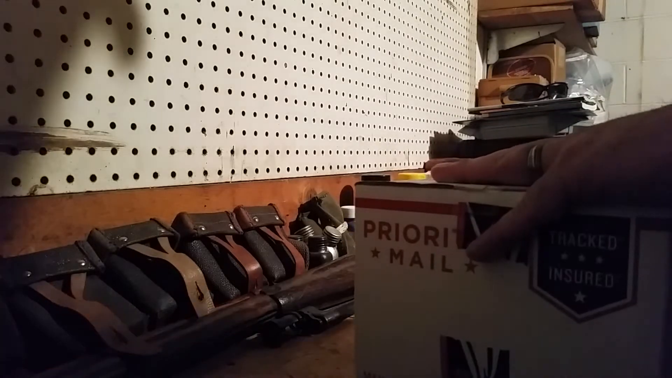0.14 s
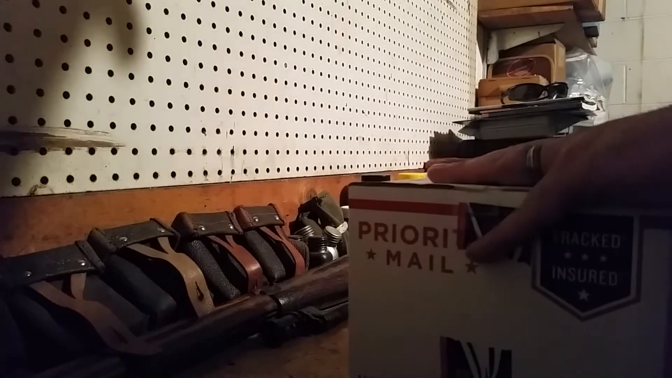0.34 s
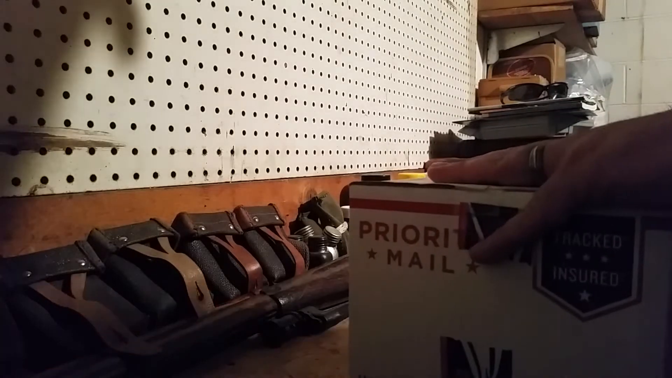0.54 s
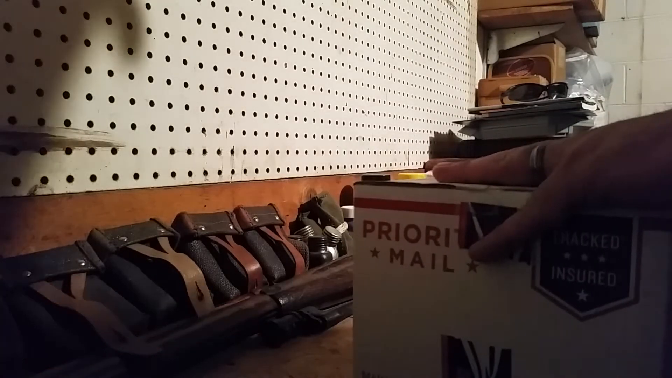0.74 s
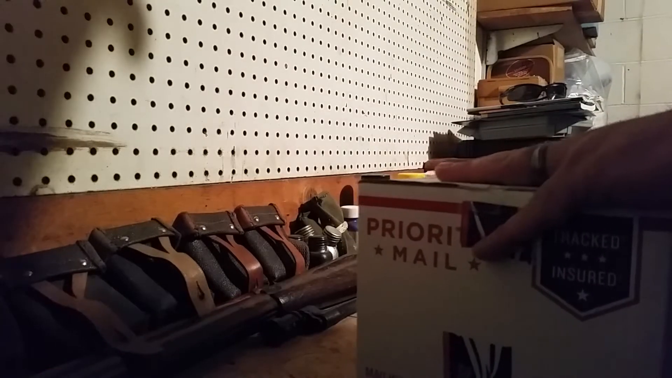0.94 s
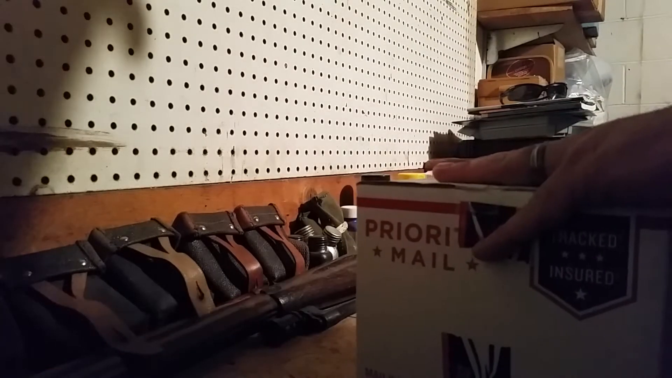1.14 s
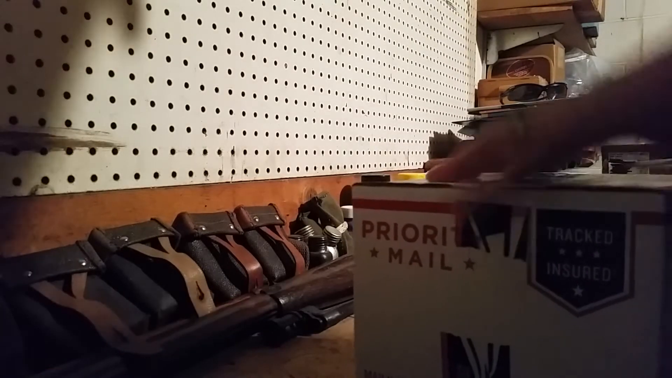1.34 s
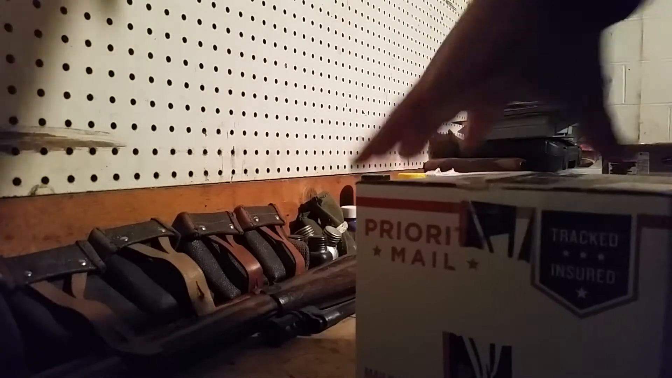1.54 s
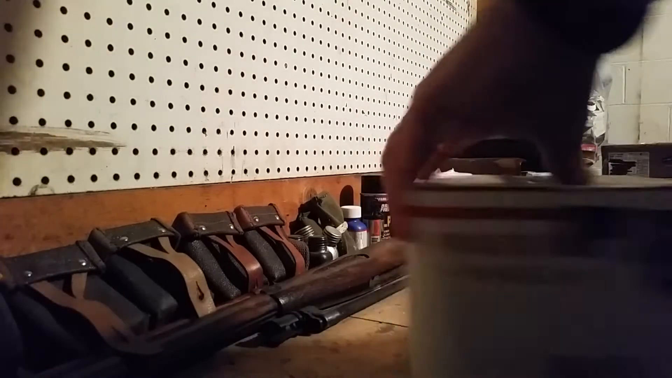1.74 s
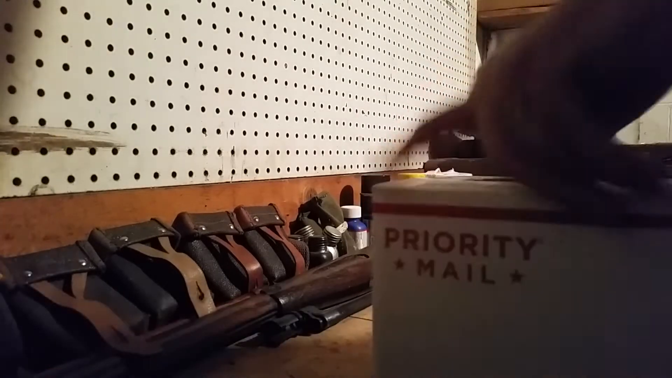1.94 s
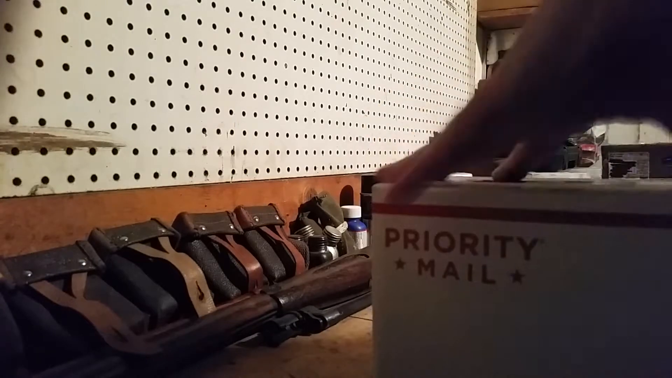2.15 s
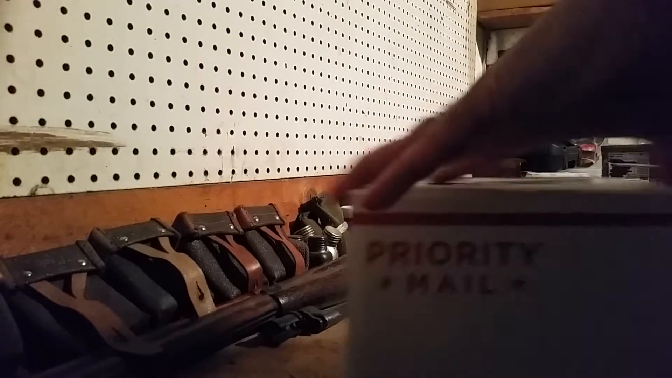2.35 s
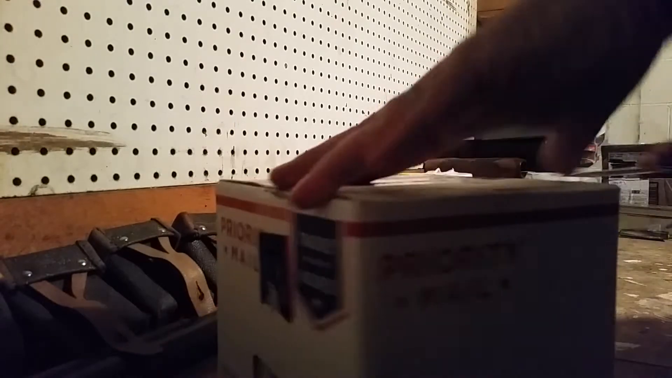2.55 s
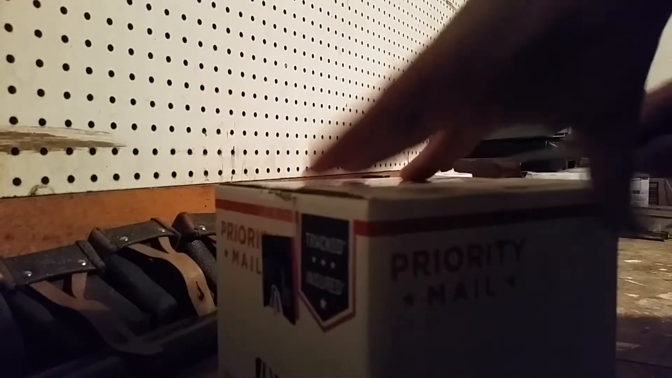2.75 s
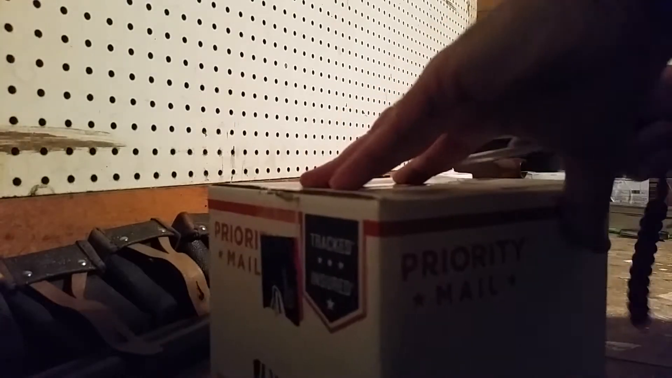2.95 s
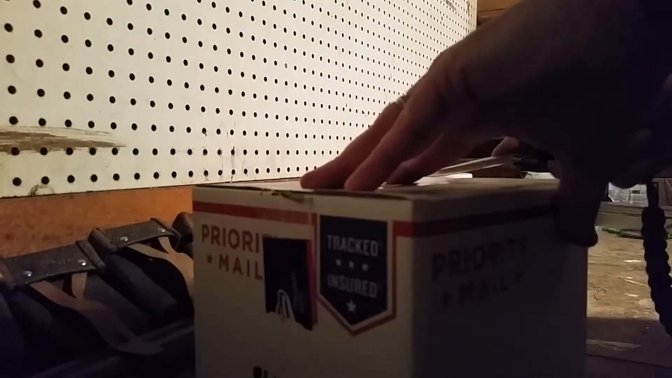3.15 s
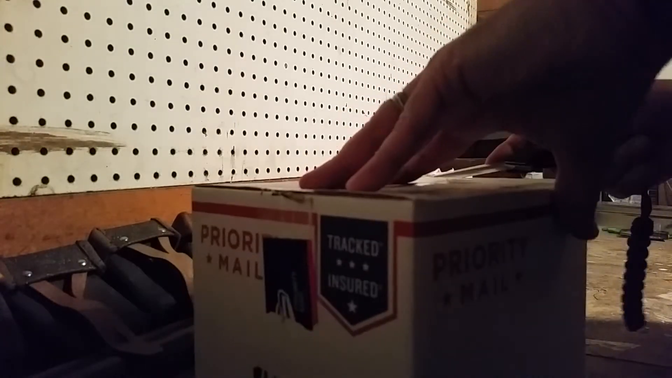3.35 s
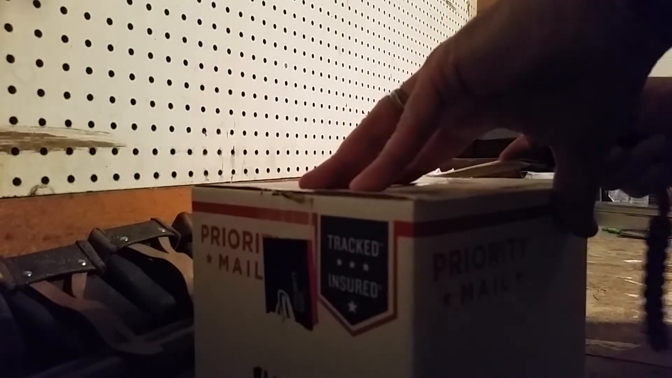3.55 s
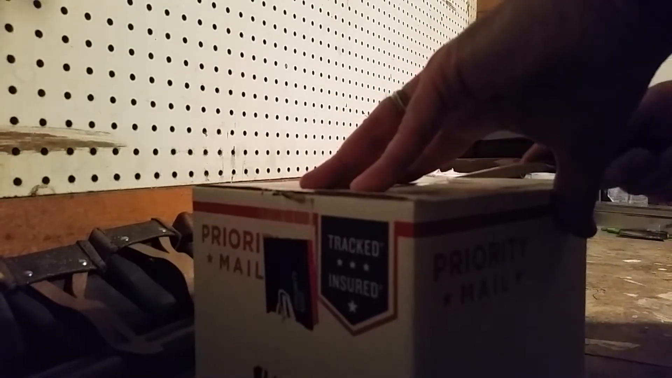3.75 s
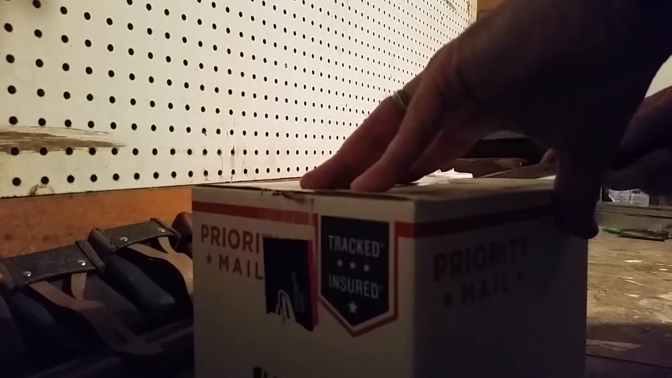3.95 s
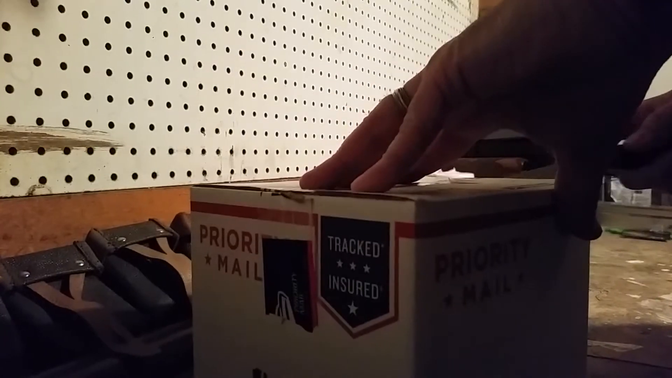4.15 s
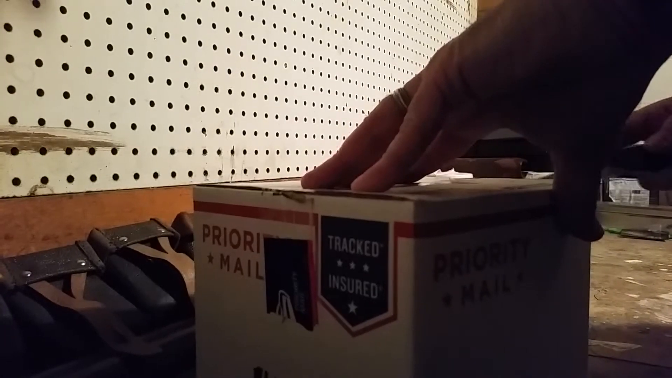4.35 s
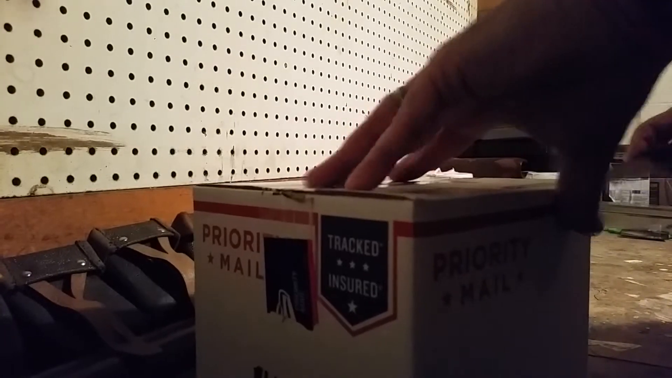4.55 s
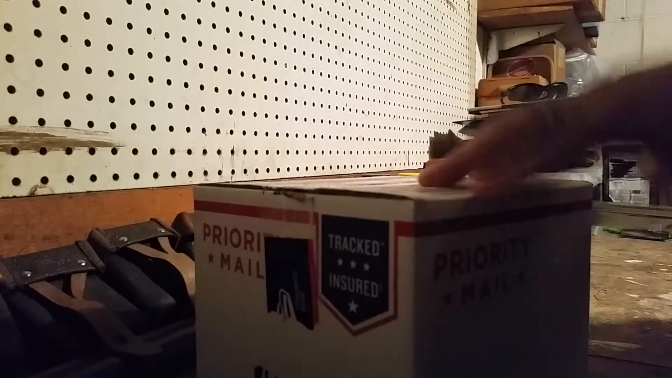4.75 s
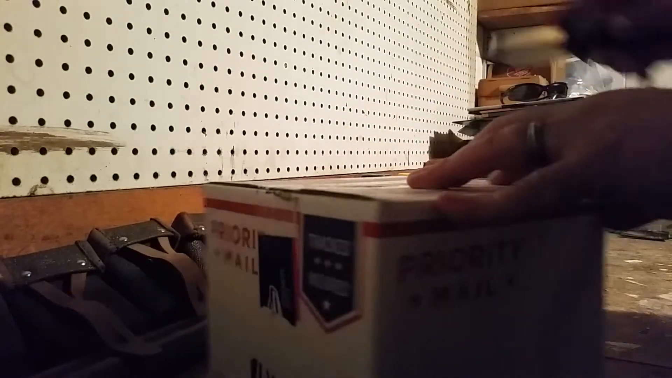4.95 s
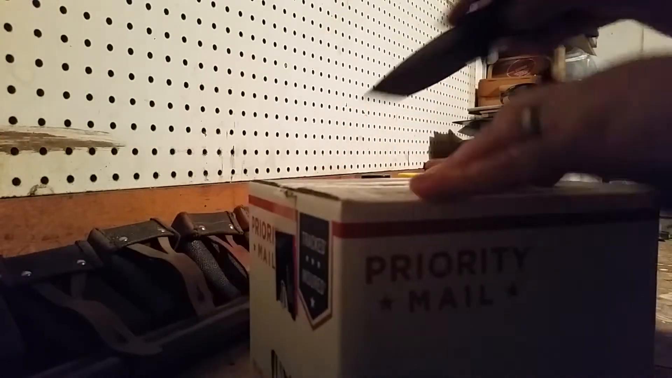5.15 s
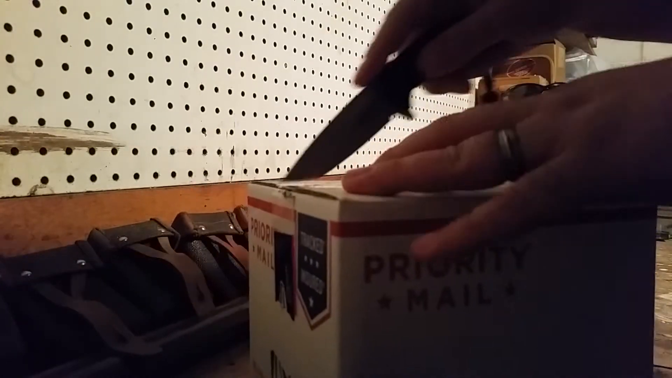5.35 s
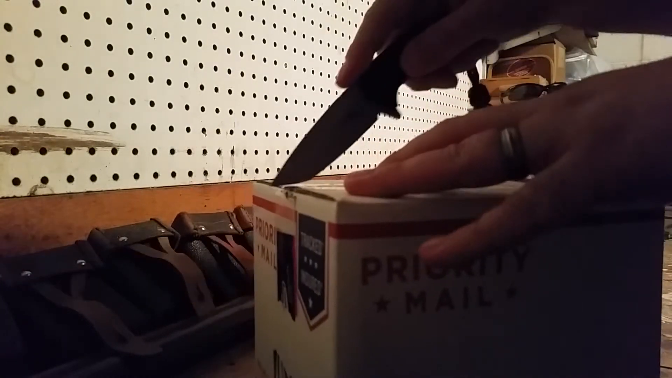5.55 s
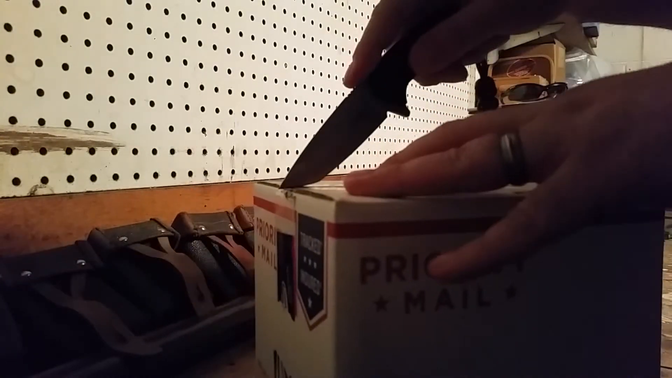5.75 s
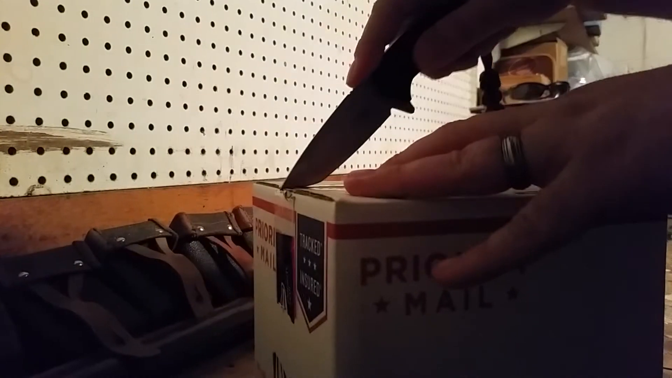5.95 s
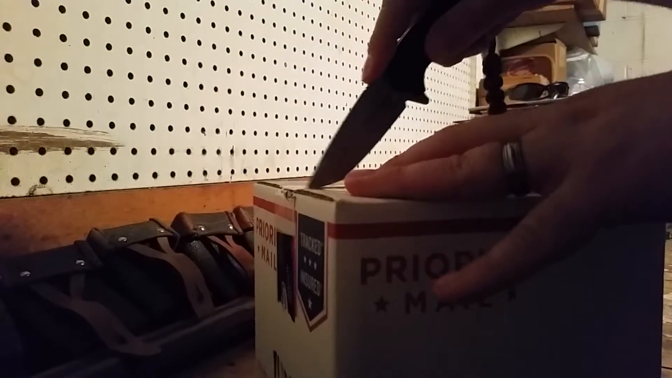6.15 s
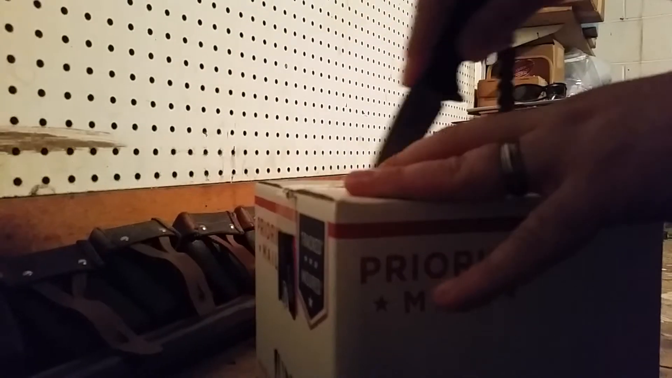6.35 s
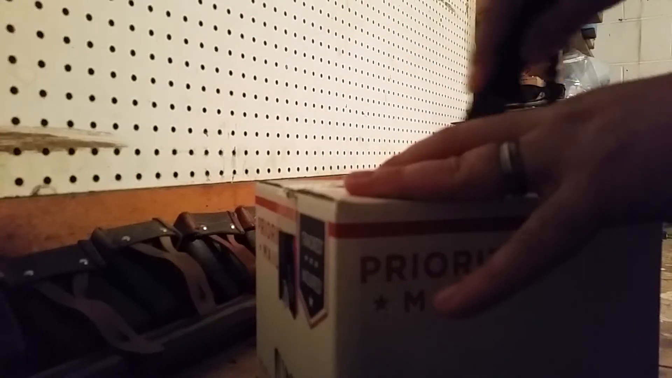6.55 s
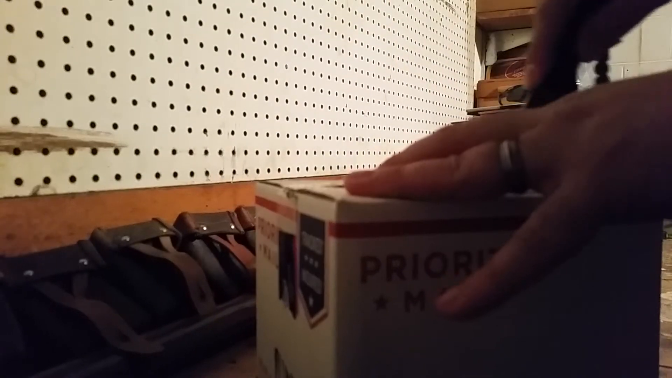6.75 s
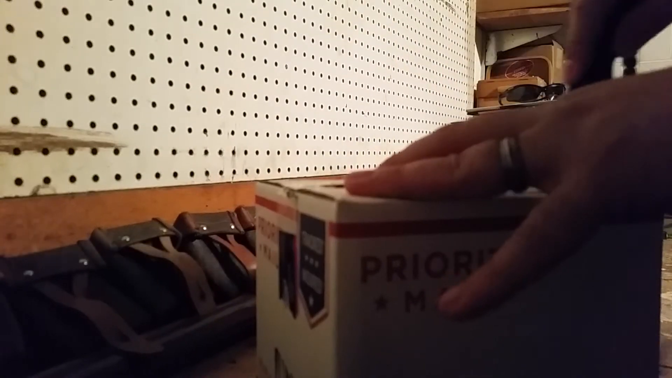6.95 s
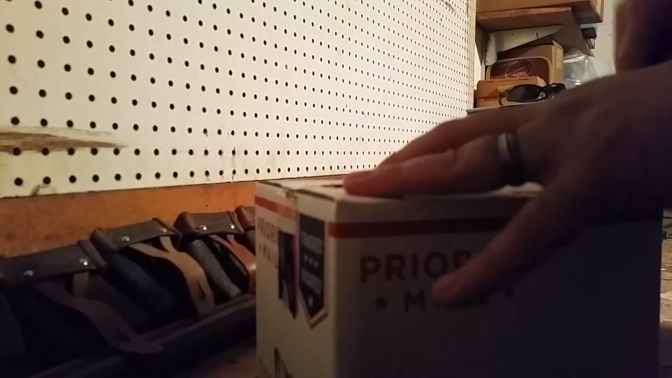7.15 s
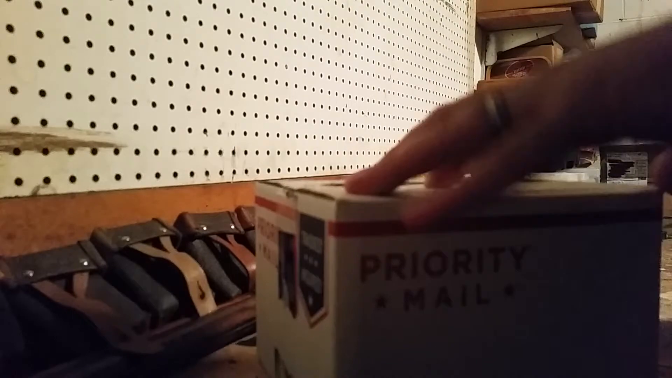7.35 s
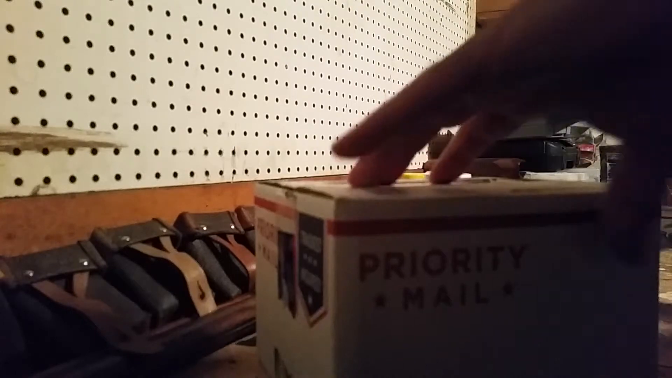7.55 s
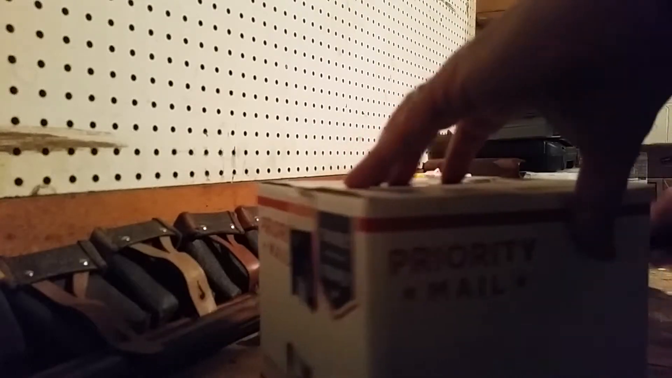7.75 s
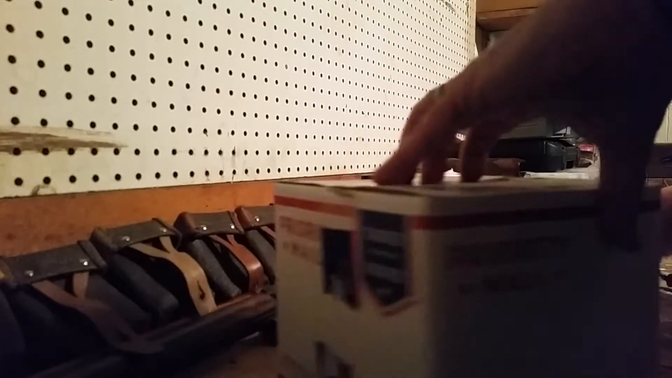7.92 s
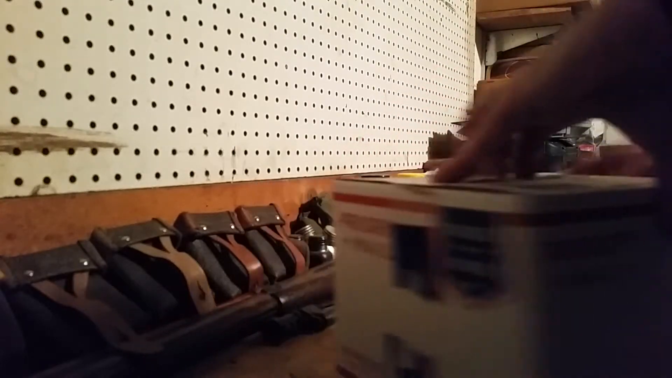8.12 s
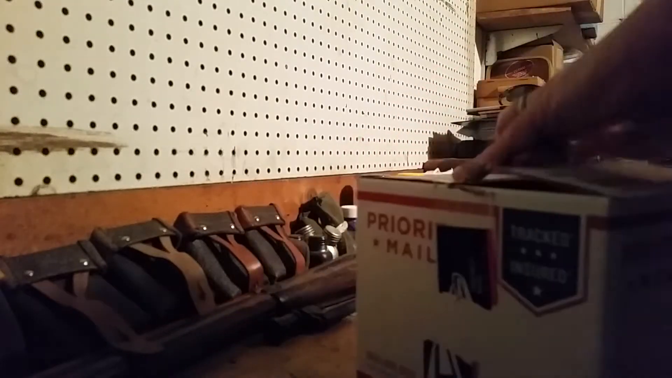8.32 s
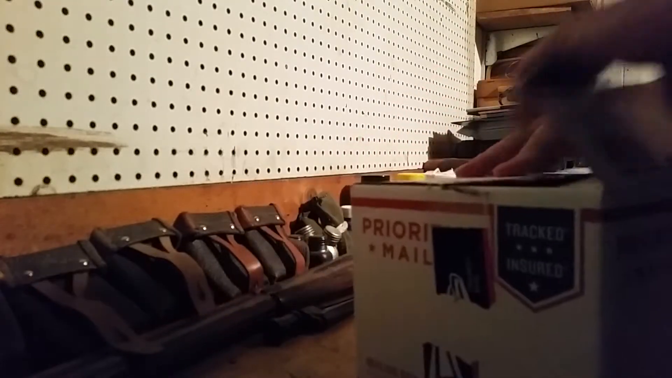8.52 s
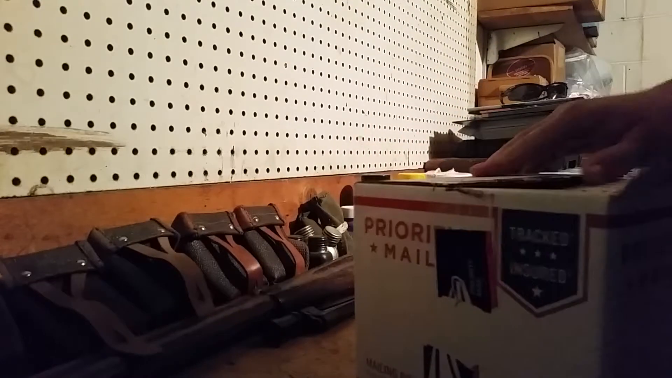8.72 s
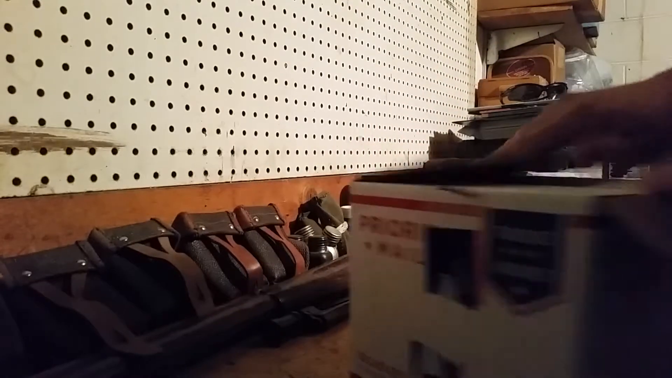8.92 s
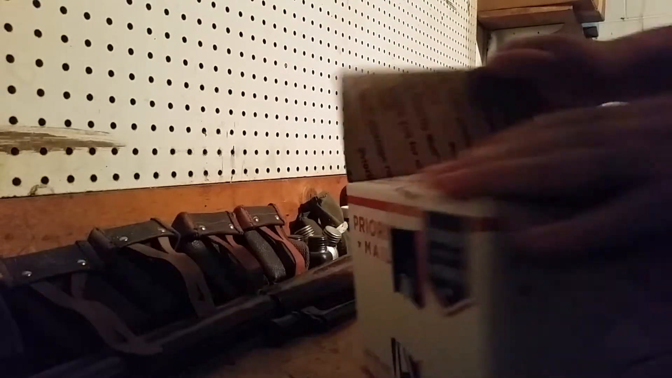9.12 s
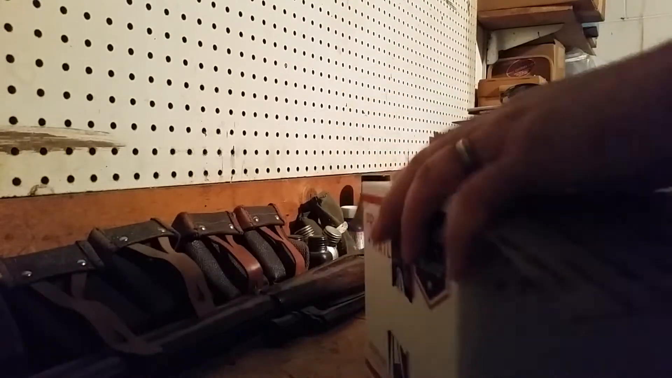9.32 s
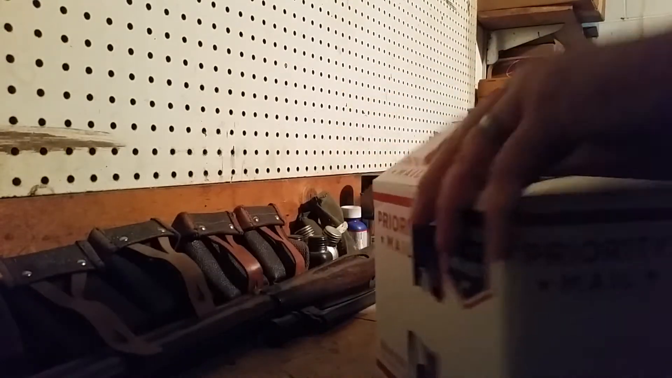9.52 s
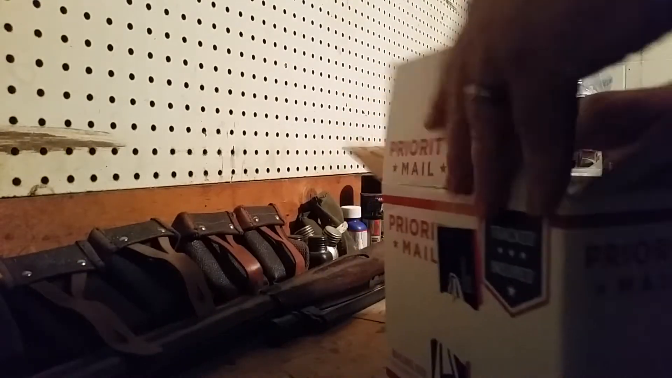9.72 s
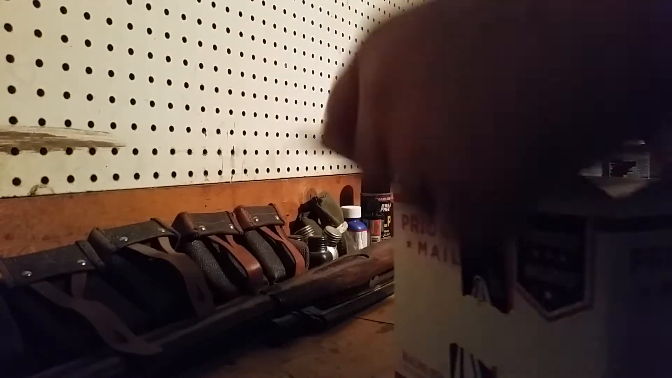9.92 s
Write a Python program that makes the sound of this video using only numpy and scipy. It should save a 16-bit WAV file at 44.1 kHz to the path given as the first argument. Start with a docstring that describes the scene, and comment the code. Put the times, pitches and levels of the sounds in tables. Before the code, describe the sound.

Close by, a cardboard box scuffs and bumps as it is turned on a wooden workbench. A knife scrapes through packing tape in a few short strokes, with small sharp ticks and a firm knock between them. Then a quick cluster of hollow knocks and snaps comes as the flaps are pulled free, followed by cardboard rustling and scraping as they fold back. The room is quiet.

```python
"""A light bump and a scuff of cardboard, right by the microphone: a taped box is turned, dragged and cut
open with a knife on a wooden workbench. Grit under the box and fibres at the blade give dense clicks
that ring the bench, the box walls and the flaps; knocks and snaps strike the same parts.
The microphone is a phone lying on the bench in a quiet shop. Its two ports ring near 11 kHz,
and the right one is nearer the box."""
import sys
import numpy as np
from scipy import signal
from scipy.fft import rfft, irfft
from scipy.io import wavfile
from scipy.ndimage import uniform_filter1d, map_coordinates

SR = 44100
rng = np.random.default_rng(int(sys.argv[2]) if len(sys.argv) > 2 else 0)


def file_out(sig):
    """Save sig as 16-bit WAV at sys.argv[1]."""
    # one column per channel
    cols = np.atleast_2d(sig).T
    # limit, then scale
    lim = np.clip(cols, -1, 1)
    pcm = np.round(lim * 32767).astype(np.int16)
    wavfile.write(sys.argv[1], SR, pcm)


N = 440118
T = np.arange(N) / SR

# Tone curves. Each row: frequency in Hz, relative level in dB.
AIR_TONE = [(60, -12), (125, -4), (250, -18.5), (450, -24), (4000, -41.5), (9000, -67)]  # still shop air and electronics
GRIT_TONE = [(300, 4.5), (1000, -7), (3000, 0.5), (5500, -3), (9000, -3.5), (16000, -4)]  # grit and fibres slipping
TICK_TONE = [(1000, -9), (4000, -2.5), (10500, -7), (16000, -1.5)]
THUD_TONE = [(30, -23), (90, 2.5), (200, -32.5)]  # the whole bench jolts
LEFT_PORT_TONE = [(20, -3), (90, 5), (300, 3), (7800, -3), (9400, 18), (11000, 18), (12500, 11.5),
                  (16000, 16)]
RIGHT_PORT_TONE = [(20, -9), (60, 5.5), (7800, -2), (9300, 11), (10900, 24.5), (12200, 15), (16000, 10.5)]
# Resonances. Each row: frequency in Hz, width in Hz, relative level in dB.
BENCH_MODES = [(94.4, 36, -3.5), (126.2, 20.5, -2.5), (156.3, 34, -0.5), (214.2, 22.3, -1),
               (242.5, 20.3, -0.5), (295.5, 16, -9)]
WALL_MODES = [(342.4, 56, -1.5), (402.7, 40, -2), (464, 45, -2.5), (517, 47, -3.5), (630, 99, 2.5),
              (754, 24, -6), (754, 33, 1)]
FLAP_MODES = [(1035, 320, 7), (1217, 20, 1.5), (1373, 206, 5), (1620, 110, 1.5), (1680, 96, 1),
              (1960, 227, 9), (2197, 505, 9), (2730, 71, 4.5), (2840, 670, 9), (4200, 600, -19.5)]
KNIFE_MODES = [(1810, 65, 1), (2150, 90, -6), (3050, 90, 2)]
# The moving point of contact. Each row: time in seconds, where bench, walls and flaps ring most in Hz,
# left minus right in dB, rubbed walls above bench in dB.
CONTACT_PATH = [(0.0, 180, 430, 1680, -6, -11.5), (2.3, 189, 446, 1516, -6, -1.5),
                (4.2, 198, 429, 1290, -4.5, -12), (5.39, 199, 480, 1620, -7.5, -5.5),
                (6.06, 160.5, 396, 1270, -4, -7.5), (7.28, 154, 500, 2150, -6.5, -8.5),
                (7.62, 197, 448, 1210, -3, -3), (8.48, 220, 427, 1470, -7.5, -3.5),
                (9.23, 140, 479, 1750, -7, -6.5), (9.98, 164, 486, 1870, -5.5, 0)]
# The knife touches something hard. Each row: start in seconds, relative level in dB.
KNIFE_TAPS = [(8.349, -42), (8.506, -33.5)]
# Blade or hand binds. Each row: peak time in seconds, seconds to gain and to lose 20 dB, pitch in Hz,
# glide in Hz per second, relative level in dB.
WALL_GROANS = [(1.255, 0.029, 0.036, 458, 101, -33), (6.56, .05, 0.12, 404, 297, -38),
               (6.712, 0.018, 0.087, 504, 100, -37)]
# Knocks on the box. Each row: start in seconds, relative levels of walls, bench and flaps in dB,
# where the walls ring most in Hz.
BOX_KNOCKS = [(0.029, -81.5, -44, -84, 501), (0.466, -52, -38, -39.5, 484), (1.069, -29, -27.5, -38, 350),
              (1.113, -39, -37.5, -36, 406), (1.208, -28, -50, -35, 420), (1.253, -26.5, -30, -56, 434),
              (1.398, -33, -36, -52, 340), (1.693, -50, -31, -53, 490),(1.768, -38, -38, -48, 340),
              (2.232, -39, -39.5, -47.5, 322), (2.492, -30.5, -34, -37, 334),
              (2.571, -26, -36.5, -31.5, 410), (2.715, -37, -58, -39.5, 432), (2.856, -45.5, -46, -55, 487),
              (3.361, -51, -47, -59, 342), (3.509, -52, -41.5, -72, 364), (4.612, -40, -39.5, -39, 427),
              (4.66, -35.5, -35.5, -43.5, 400), (4.83, -42, -45, -40.5, 500),
              (4.974, -41.5, -33.5, -39, 401), (5.311, -40.5, -36.5, -50, 510), (5.408, -54, -45, -51, 536),
              (5.762, -55.5, -45, -64, 458), (6.331, -17, -24.5, -43, 368), (6.483, -32.5, -40, -39, 398),
              (7.104, -31.5, -25.5, -27.5, 410), (7.813, -35, -43, -52, 415), (7.988, -17, -27.5, -26, 526),
              (8.045, -16.5, -31, -29, 417), (8.077, -21, -45, -22, 404), (8.118, -16.5, -37, -37, 520),
              (8.142, -16, -39, -32, 418), (8.203, -17.5, -36, -33, 440), (8.401, -19.5, -29.5, -22, 394),
              (8.49, -37.5, -41, -48, 440), (8.664, -35, -36.5, -37.5, 567), (8.916, -32.5, -34, -45, 680),
              (8.982, -30, -40, -47, 428), (9.433, -25, -24.5, -31, 390), (9.474, -35.5, -32.5, -54, 369)]
# Bright ticks of tape, glue and knife tip. Each row: start in seconds, relative level in dB.
TAPE_TICKS = [(0.1735, -42), (0.344, -34), (0.4419, -33), (0.6953, -18), (0.7337, -17), (0.7761, -17.5),
              (0.803, -22), (1.0216, -25.5), (1.2061, -14), (1.4895, -32), (1.6846, -37), (1.717, -21.5),
              (1.7669, -17), (2.1477, -30), (2.3364, -29), (2.6643, -34), (3.0908, -28), (3.4221, -39.5),
              (4.324, -24), (4.7214, -32), (4.8344, -36), (4.9492, -29), (4.9684, -22), (5.003, -15),
              (5.0757, -11), (5.0983, -15), (5.3482, -33), (5.7106, -32.5), (6.1973, -23.5),
              (6.3235, -22.5), (6.6145, -19), (7.6872, -13), (7.7588, -21), (7.812, -17), (8.0765, -10),
              (8.329, -27), (8.4012, -16), (8.6345, -24), (8.6744, -16), (9.0558, -17), (9.434, -13.5)]
# Pushes, drags and touches of box and hand. Each row: peak time in seconds, seconds for the grit to gain
# and to lose 10 dB, relative levels of grit, flaps and bench in dB.
BOX_RUBS = [(0.065, 0.039, 0.032, -66, -83.5, -44.5), (0.185, 0.012, 0.054, -52, -75, -63),
            (0.285, 0.068, 0.16, -41, -55, -40.5), (1.028, 0.055, 0.011, -44, -51.5, -42),
            (1.134, 0.083, 0.13, -33, -39, -41), (1.212, 0.016, 0.044, -27, -40.5, -29.5),
            (1.369, 0.023, 0.07, -38, -51, -43.5), (1.49, 0.013, 0.054, -45, -55.5, -51),
            (1.709, 0.012, 0.16, -45, -55, -44.5), (1.891, 0.1, 0.13, -23.5, -41.5, -42.5),
            (2.17, 0.043, 0.12, -43, -75, -78), (2.404, 0.062, 0.15, -29.5, -44, -42.5),
            (2.494, 0.066, 0.062, -24, -38, -44), (2.672, 0.029, 0.047, -44.5, -54, -47),
            (2.954, 0.071, 0.21, -51, -65.5, -54), (3.151, 0.07, 0.073, -39.5, -54, -41.5),
            (3.265, 0.121, 0.023, -58, -62, -70.5), (3.417, 0.029, 0.023, -60, -72, -50.5),
            (4.675, 0.078, 0.059, -48.5, -54.5, -49), (4.862, 0.097, 0.2, -54.5, -65, -69),
            (5.007, 0.024, 0.11, -35, -46, -37), (5.176, 0.16, 0.063, -31.5, -41, -38.5),
            (5.317, 0.07, 0.032, -43, -55, -56), (5.412, 0.014, 0.027, -51, -62, -54),
            (5.638, 0.08, 0.031, -48.5, -61.5, -50.5), (5.766, 0.248, 0.015, -64, -71, -60.5),
            (6.246, 0.075, 0.202, -45, -56.5, -44), (6.333, 0.028, 0.041, -32, -39, -37)]
# Pressure curves. Each row: time in seconds, relative levels of grit, flaps and bench in dB.
BLADE_PRESSURE = [
    [(.47, -36.5, -45.5, -35), (.61, -37.5, -41, -37.5), (.765, -44, -49, -41.5), (.79, -57, -50.5, -49),
     (.97, -53, -54, -49)],
    [(3.5, -81, -65, -49), (3.78, -55.5, -52, -42.5), (4.27, -48.5, -49, -39.5), (4.32, -41.5, -45, -36.5),
     (4.45, -40.5, -45.5, -38), (4.55, -29.5, -36.5, -30)],
    [(6.4, -44, -45.5, -34.5), (6.6, -42.5, -46, -39.5), (6.62, -36.5, -45, -41), (6.66, -32.5, -46, -47),
     (6.68, -45, -54, -46), (6.72, -39.5, -42.5, -40), (6.89, -51, -43.5, -45.5), (7.11, -33.5, -39, -38)],
]  # one list per knife stroke
FLAP_PULLS = [(7.17, -53.5, -60.5, -54), (7.34, -62.5, -71, -61.5), (7.64, -43.5, -61, -54),
              (7.95, -34, -46.5, -39.5), (8.14, -34, -33, -30.5), (8.23, -34.5, -43.5, -32.5),
              (8.31, -38, -52, -46.5), (8.5, -44.5, -51, -44.5), (8.57, -54, -68, -64),
              (8.67, -39.5, -58, -48), (8.7, -42, -59, -49), (8.93, -35.5, -55.5, -57),
              (9.01, -44, -51, -42), (9.06, -33, -44, -46), (9.1, -35, -54, -44), (9.31, -32, -48, -42.5),
              (9.35, -28.5, -40, -39), (9.48, -39.5, -50.5, -48.5), (9.61, -33.5, -40, -40.5),
              (9.7, -35, -49, -46.5), (9.93, -30.5, -50.5, -48.5), (9.98, -27.5, -27, -34)]  # fingers pull the flaps free and fold them back
# The blade's echo and tone. Each row: start and end in seconds, echo delay at start and at end in ms,
# echo strength, treble tilt in dB, sizzle near 13 kHz in dB.
BLADE_PASSES = [(.46, 0.99, 0.96, 0.73, 0.093, 1.5, 0), (3.48, 4.554, 0.69, 0.69, 0.46, -4.5, 4.5),
                (6.698, 7.1, 0.39, 0.49, 0.39, -1.5, 5.5)]


def undb(db):
    """dB to gain."""
    return 10 ** (np.asarray(db) / 20)


def curves(table):
    """Value columns of a timed table at every sample."""
    times, *columns = np.transpose(table)
    return [np.interp(T, times, column) for column in columns]


def colour(x, points):
    """Causal filter that follows (Hz, dB) points."""
    hz, db = np.transpose(points)
    curve_db = np.interp(np.log(np.arange(1025) * SR / 2048 + 1), np.log(hz), db)
    cepstrum = irfft(curve_db * np.log(10) / 20)
    cepstrum[1:1024] *= 2  # fold to minimum phase
    cepstrum[1025:] = 0
    return signal.oaconvolve(x, irfft(np.exp(rfft(cepstrum)))[None], axes=-1)[:, :x.shape[1]]


def unit(x):
    """Scales a sound to rms 1 as heard through the right port."""
    return x / np.sqrt(np.mean(colour(x[1:], RIGHT_PORT_TONE) ** 2))


def ring(x, modes, near_hz, octaves, sign=-1):
    """Sum of resonances; those close to near_hz are driven hardest; sign 1 starts all in step."""
    out, power = 0, 0
    for k, (hz, width, db) in enumerate(modes):
        gain = undb(db) * np.exp(-.5 * (np.log2(hz / near_hz) / octaves) ** 2)
        mode = signal.lfilter(*signal.iirpeak(hz, hz / width, SR), x) / np.sqrt(width)
        out = out + sign ** k * gain * mode
        power = power + gain ** 2
    return out / np.sqrt(power)


def walk(rate):
    """Random levels held 1 / rate seconds and slewed; spread a little under 1."""
    hold = int(SR / rate)
    return 0.92 * uniform_filter1d(np.repeat(rng.standard_normal(N // hold + 1), hold), hold)[:N]


def shop_air():
    """Faint room tone and microphone hiss that swells a little."""
    level = undb(-58.5 + 2.2 * walk(3.3))
    noise = rng.standard_normal((2, N)) + 1.4 * rng.standard_normal(N)
    return level * unit(colour(noise, AIR_TONE))


def room_tail(x, t60_s=0.14, level_db=-7):
    """The shop's close walls return a short diffuse tail, different at each port."""
    t = np.arange(SR // 2) / SR
    tail = rng.standard_normal((2, len(t))) * undb(-60 * t / t60_s) * (t > .002)
    return undb(level_db) * signal.oaconvolve(x, tail / np.linalg.norm(tail[0]), axes=-1)[:, :N]


def strike(table, fade_s, tail_s, push_s, push):
    """Each blow is one firm push and a short rattle, new for every part, with a weak gritty tail."""
    parts, t = len(fade_s), np.arange(2048) / SR
    force = np.zeros((parts, N + len(t)))
    fade = np.exp(-t / np.c_[fade_s]) + 0.18 * np.exp(-t / tail_s)
    shove = np.c_[push] * (t < np.c_[push_s]) * np.sin(np.pi * t / np.c_[push_s])
    for row, rattle in zip(table, rng.standard_normal((len(table), parts, len(t)))):
        start, burst = int(row[0] * SR), fade * rattle + shove
        burst /= np.linalg.norm(burst, axis=1, keepdims=True)
        force[:, start:start + len(t)] += burst * undb(row[1:1 + parts])[:, None]
    return force[:, None, :N]


def knife_clinks():
    """Light taps ring the knife briefly."""
    taps = strike(KNIFE_TAPS, fade_s=[.003], tail_s=.01, push_s=[.0001], push=[2.5])[0]
    return undb(59) * ring(taps, KNIFE_MODES, near_hz=2300, octaves=2)


def wall_groans():
    """Regular stick and slip locks onto a box wall's resonance; the tone glides and wavers."""
    out, waver, roughness = np.zeros(N), 1 + 0.063 * walk(90), undb(7.1 * walk(110))
    for peak, rise, fall, hz, glide, db in WALL_GROANS:
        span = slice(int((peak - 3 * rise) * SR), int((peak + 3 * fall) * SR))
        t = T[span] - peak
        level = undb(db - 20 * np.maximum(-t / rise, t / fall))
        pitch_hz = (hz + glide * t) * waver[span]
        out[span] += level * np.sin(2 * np.pi * np.cumsum(pitch_hz) / SR)
    return np.sqrt(2) * roughness * out


def knocks_and_ticks(bench_hz, flaps_hz):
    """Knocks ring walls, bench and flaps; ticks are heard directly. Returns box and bench sound."""
    wall_blows, bench_blows, flap_blows = strike(
        BOX_KNOCKS, fade_s=[.006, .005, .003], tail_s=0.038,
        push_s=[.0007, .002, .00012], push=[.6, .9, 2.5])
    ticks = strike(TAPE_TICKS, fade_s=[0.00081], tail_s=.005, push_s=[.00005], push=[4.])[0]
    starts, spot_hz = np.transpose(BOX_KNOCKS)[[0, 4]]
    walls_hz = spot_hz[np.maximum(np.searchsorted(starts, T) - 1, 0)]  # set by the last spot struck
    walls = undb(59) * ring(wall_blows, WALL_MODES, walls_hz, 0.3, sign=1.0)
    flaps = undb(55) * ring(flap_blows, FLAP_MODES, flaps_hz, 0.5, sign=0.99)
    box = colour(walls + flaps, [(5500, 0), (10000, -7)]) + undb(5.5) * colour(ticks, TICK_TONE)
    bench = undb(62.5) * ring(bench_blows, BENCH_MODES, bench_hz, 0.5)
    thud = undb(33) * colour(bench_blows, THUD_TONE)
    return box, bench + thud


def slips(rate, spread_db, alike):
    """Random clicks of uneven size; a share 'alike' of their power reaches both ports the same."""
    clicks, count = np.zeros((3, N)), int(3 * rate * N / SR)
    size = rng.standard_normal(count) * undb(spread_db * np.minimum(rng.exponential(size=count), 4))
    clicks.ravel()[rng.integers(0, 3 * N, count)] = size
    return np.sqrt(alike) * clicks[0] + np.sqrt(1 - alike) * clicks[1:]


def effort(rest_db=-72, lift_s=0.031):
    """Grit, flap and bench levels in dB: rubs swell and fade, strokes and pulls follow their curves."""
    # faint hiss of skin and sleeves between moves
    power = np.outer(undb([rest_db, -120, -120]) ** 2, np.minimum(T / .1, 1) + 1e-6)
    swell_db = 10 * np.c_[[1, 0.86, 0.47]]  # flaps and bench swell less than the grit
    for peak, rise, fall, *db in BOX_RUBS:
        span = slice(max(int((peak - 4 * rise) * SR), 0), int((peak + 4 * fall) * SR))
        away = np.maximum((peak - T[span]) / rise, (T[span] - peak) / fall)
        power[:, span] += undb(np.c_[db] - swell_db * away ** 2.01) ** 2
    for move in BLADE_PRESSURE + [FLAP_PULLS]:
        outside_s = np.maximum(np.maximum(move[0][0] - T, T - move[-1][0]), 0)
        power += undb(np.array(curves(move)) - 20 * outside_s / lift_s) ** 2
    return 10 * np.log10(power)


def blade_echo(x):
    """The blade is one small moving spot, so its echo off the bench combs x. Also returns a 0-1 gate."""
    out, cutting = x, 0
    for start, end, from_ms, to_ms, strength, tilt_db, sizzle_db in BLADE_PASSES:
        gate = np.clip(np.minimum(T - start, end - T) / 0.046, 0, 1)
        span = slice(int(start * SR), int(end * SR) + 1)
        tone = [(2500, 0.0046), (6000, tilt_db), (11000, 0), (12800, sizzle_db), (15000, tilt_db)]
        direct = colour(x[:, span], tone)
        length = direct.shape[1]
        delayed = np.arange(length) - np.linspace(from_ms, to_ms, length) * SR / 1000
        dull = colour(direct[1:], [(3500, 0), (9000, -7)])[0]
        echo = strength * map_coordinates(dull, [delayed]) * [[0], [1]]  # only the near port catches it
        combed = np.zeros_like(x)
        combed[:, span] = (direct + echo) / np.sqrt(1 + strength ** 2)
        out = out + gate * (combed - x)
        cutting = cutting + gate
    return out, cutting


def rubbing_and_cutting(bench_hz, walls_hz, flaps_hz, walls_over_db):
    """Stick and slip come in shared bursts; each part rings its own way. Returns box and bench sound."""
    grit_db, flaps_db, bench_db = effort()
    grit, cutting = blade_echo(unit(colour(slips(9000, 1.2, 0.044), GRIT_TONE)))
    flaps, _ = blade_echo(unit(ring(slips(5000, 1.9, 0.2), FLAP_MODES, flaps_hz, 0.7)))
    # a blade runs evenly, a dragged box does not
    judder = (walk(40) + 0.93 * walk(130)) * (1 - 0.54 * cutting)
    bursts = undb(2.6 * judder)
    walls = unit(ring(slips(1500, 1.0, 1.0) * bursts, WALL_MODES, walls_hz, 0.43))
    bench = unit(ring(slips(900, 0.98, 0.86) * bursts, BENCH_MODES, bench_hz, 0.59))
    scrape = grit * undb(grit_db + 2.3 * judder) + flaps * undb(flaps_db) * bursts
    return scrape + walls * undb(bench_db + walls_over_db), bench * undb(bench_db)


def scene():
    """Close up, the box comes through the air from the right, the bench through wood to both ports."""
    bench_hz, walls_hz, flaps_hz, pan_db, walls_over_db = curves(CONTACT_PATH)
    box_rubs, bench_rubs = rubbing_and_cutting(bench_hz, walls_hz, flaps_hz, walls_over_db)
    box_hits, bench_hits = knocks_and_ticks(bench_hz, flaps_hz)
    pan = undb(np.array([pan_db, -pan_db]) / 2 + 1.0)
    box = (box_rubs + box_hits + wall_groans() + knife_clinks()) * pan
    bench = (bench_rubs + bench_hits) * undb([[-1.8], [1.6]])
    near = box + room_tail(box) + bench
    near[0] = np.roll(near[0], 5)  # the left port hears it 5 samples later
    return near + shop_air()


def record(dry):
    """Each port of the phone rings in the treble in its own way; the top is cut steeply."""
    ports = np.vstack([colour(dry[:1], LEFT_PORT_TONE), colour(dry[1:], RIGHT_PORT_TONE)])
    top_hz = 15750
    return signal.sosfilt(signal.ellip(12, .3, 60, top_hz, fs=SR, output="sos"), ports)


dry = scene()
out = record(dry)
file_out(out)
```